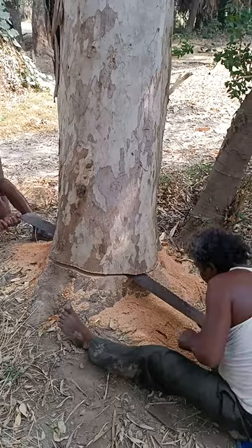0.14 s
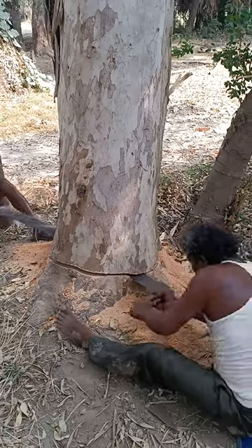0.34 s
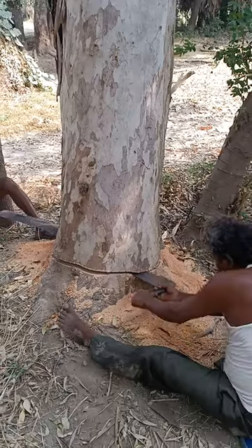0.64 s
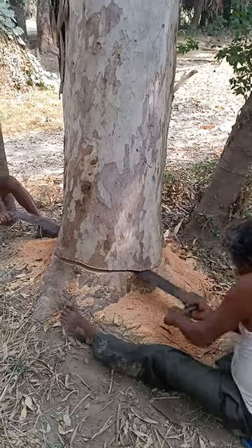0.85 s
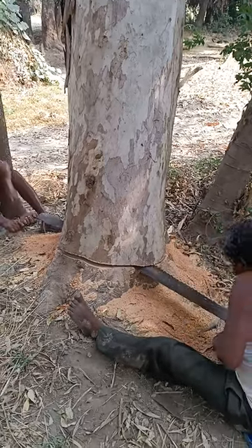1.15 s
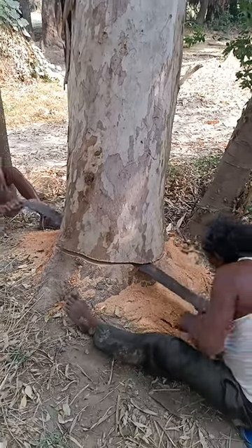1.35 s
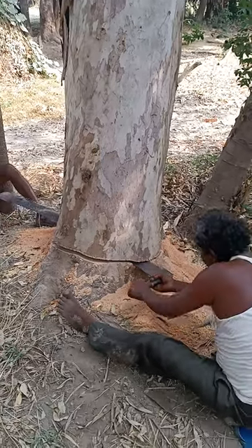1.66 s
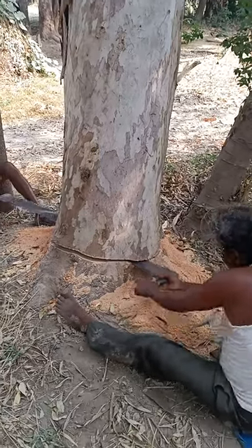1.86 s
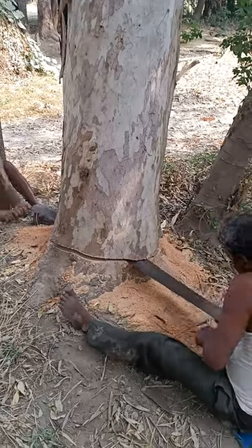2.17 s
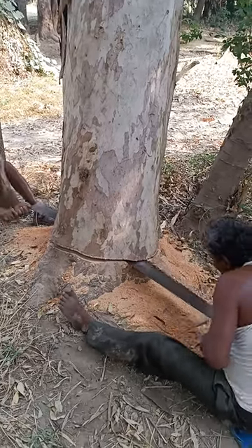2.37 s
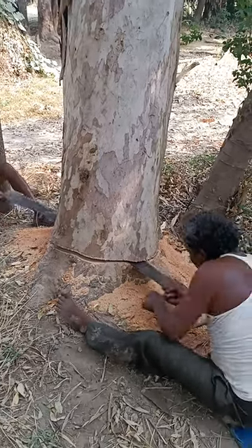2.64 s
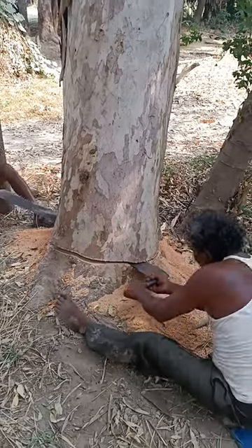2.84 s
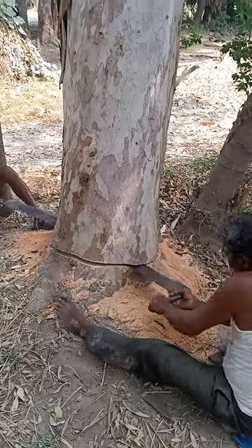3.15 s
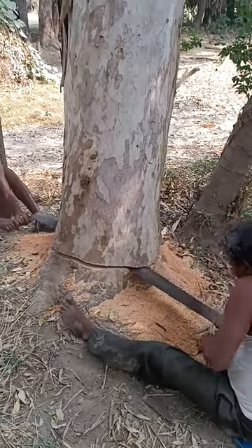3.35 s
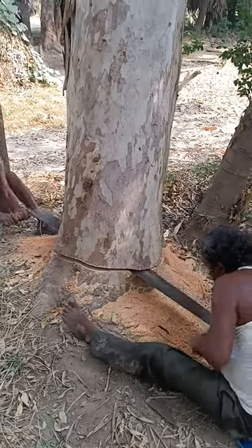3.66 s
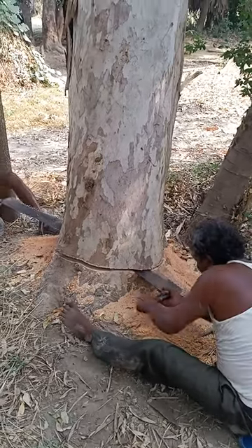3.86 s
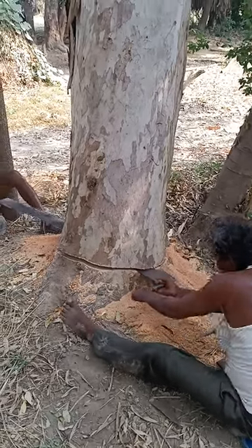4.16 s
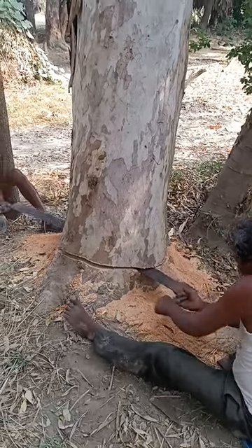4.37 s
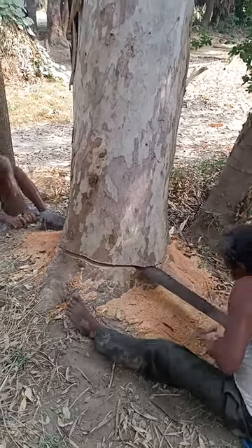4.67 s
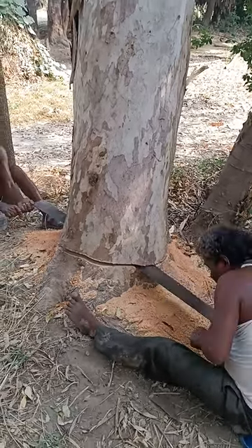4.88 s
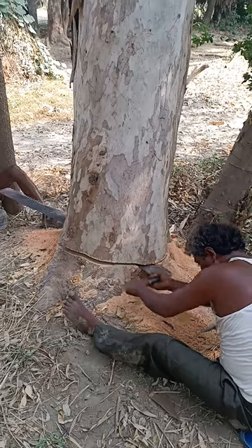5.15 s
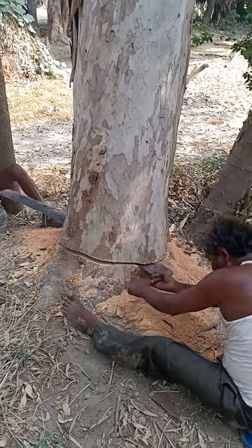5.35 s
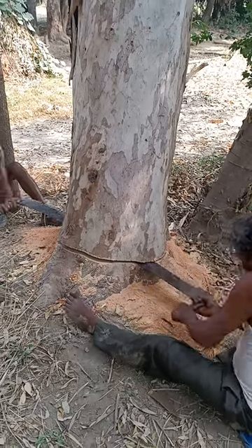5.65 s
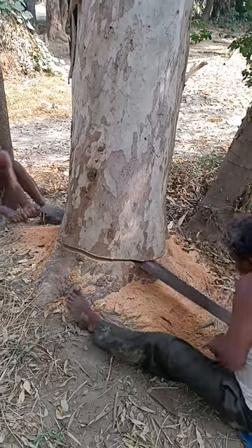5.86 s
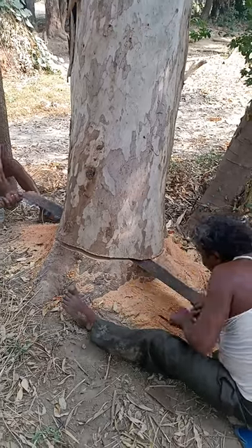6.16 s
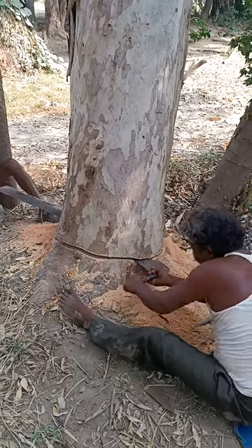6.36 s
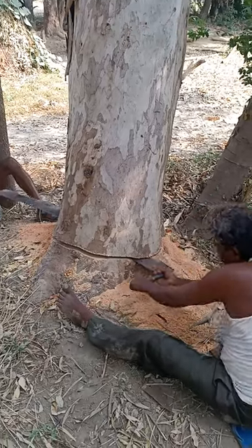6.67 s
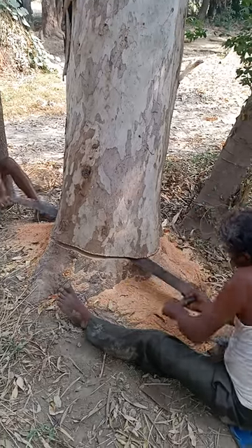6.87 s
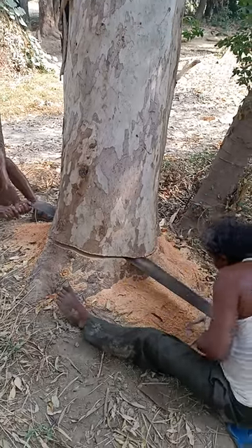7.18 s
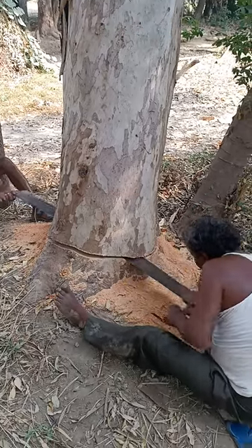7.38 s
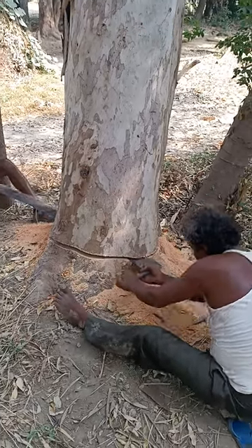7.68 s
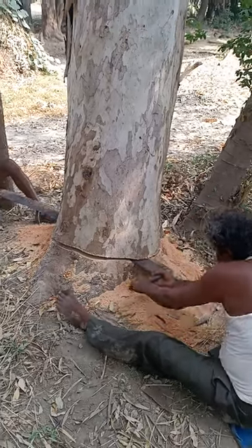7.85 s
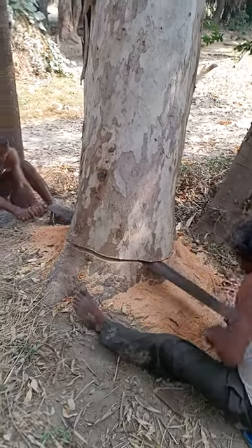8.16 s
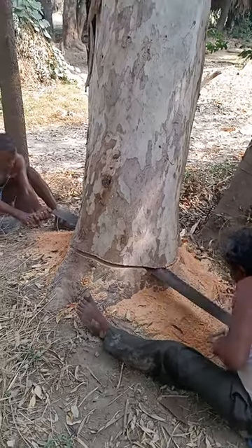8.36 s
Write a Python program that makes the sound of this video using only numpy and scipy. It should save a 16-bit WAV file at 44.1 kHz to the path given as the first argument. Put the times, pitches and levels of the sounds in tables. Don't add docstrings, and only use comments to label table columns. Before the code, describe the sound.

Steady coarse sawing strokes tear wood fibres outdoors, with snags, cracks and one knock on bark, over a distant chugging engine.

```python
import sys
import numpy as np
from scipy import signal
from scipy.fft import irfft
from scipy.io import wavfile
from scipy.ndimage import uniform_filter1d

SR = 44100
rng = np.random.default_rng(int(sys.argv[2]) if len(sys.argv) > 2 else 0)


def gain_from_decibels(decibels):
    exponent = np.asarray(decibels, float) / 20
    return 10 ** exponent


def generate_wav(signal):
    frames = np.transpose(np.atleast_2d(signal))
    scaled = np.clip(frames, -1, 1) * 32767
    pcm = np.round(scaled).astype(np.int16)
    wavfile.write(sys.argv[1], SR, pcm)


N = 375732

# (frequency [Hz], density [dB per Hz])
AIR_SPECTRUM = [(24, -34), (40, -28), (97, 3.5), (170, -11.5), (270, -18), (420, -17), (580, -13.5),
                (740, -2), (950, -9.5), (2000, -6), (2950, -8.5), (3500, -16.5), (6400, -13.5), (7500, -20),
                (8600, -33.5)]
# (frequency [Hz], likeness [0 to 1])
AIR_COHERENCE = [(60, 0.52), (380, 0.84), (750, 0.2), (1300, 0.071), (4400, .03)]
AIR_DB = -52.5

# (frequency [Hz], width [Hz], level [dB])
ENGINE_HUM = [(396, 84, -68), (719, 43, -66), (1097, 40, -64)]
# (frequency [Hz], level [dB], decay by 60 dB [s])
EXHAUST_MODES = [(79, -46, 0.14), (166, -69, .07)]
FIRST_FIRING_S, FIRING_PERIOD_S = 0.072, 0.09008

# (start [s], speeding up [s], full swing [s], slowing down [s], cutting force [dB])
SAW_STROKES = [(0.02, 0.28, 0.076, 0.21, -26), (.70, 0.29, 0.086, 0.14, -28),
               (1.26, 0.19, 0.11, 0.2, -25.5), (1.86, 0.32, 0.067, 0.12, -27),
               (2.41, 0.21, 0.14, 0.16, -23.5), (3.04, .27, .12, .13, -26), (3.61, 0.22, 0.1, 0.18, -25),
               (4.26, 0.17, 0.23, 0.11, -29.5), (4.82, 0.23, 0.11, 0.14, -24),
               (5.43, 0.27, 0.16, 0.14, -28), (6.02, 0.21, 0.13, 0.16, -24), (6.66, 0.24, 0.2, 0.08, -30.5),
               (7.24, .22, 0.12, 0.15, -22.5), (7.86, 0.24, 0.2, 0.088, -31.5),
               (8.41, 0.15, 0.079, 0.081, -28)]
# (power speeding up [1], power slowing down [1], gain over the swing [dB])
FORCE_LAW = [(1.76, 2.33, 2.14), (1.45, 1.58, 0.3)]
# (at start, at top speed, at end of swing, at stop)
# trunk knock relative to the rasp [dB]
KNOCK_ALONG_STROKE = [(-8.5, -1.8, -1.9, 0.5), (-5, -1.8, -0.58, 1.3)]
HISS_ALONG_STROKE = [(0, -1, -3.5, 2.3), (-1.5, -3, -4, -1.5)]
LOWER_BLADE_MODE = [(2860, 2830, 2880, 2670), (2770, 2840, 2790, 2800)]
UPPER_BLADE_MODE = [(5800, 6480, 6300, 5400), (6140, 6250, 6300, 2000)]
# (free [s], binding [s], depth [dB])
BLADE_STALLS = [
    (1.985, 0.026, -1),
    (3.285, 0.055, -13.5),
    (4.365, 0.06, -14),
    (5.478, 0.044, -14),
    (8.256, 0.065, -1.5),
]
# (middle [s], half length [s], force [dB], trunk knock re rasp [dB], blade hiss re rasp [dB])
DEEP_BITES = [(0.261, 0.08, 5, -1.7, -2), (0.432, 0.014, 4.5, -5, -8), (0.807, 0.044, 2.5, 0, -3.5),
              (1.037, 0.13, 5, -0.5, -3.6), (1.301, 0.07, 4, -2.5, 5.5), (2.007, 0.026, 7, 3, 0),
              (2.644, 0.026, 1, -3.5, 1), (2.804, 0.036, 1, 2, 1), (3.724, 0.021, 1.5, 2.2, 0),
              (3.889, 0.041, 3.5, 0.5, -2), (4.018, 0.017, 9.5, -19, -0.7), (4.307, .03, 4, -1, -2),
              (4.848, 0.047, 5, 4, 5.5), (5.137, 0.037, 4.5, -3, -4), (5.847, 0.016, -0.5, 2, 7),
              (6.06, 0.08, 5.5, 4.5, 0), (6.395, 0.021, 7, -13.5, 0.3), (7.098, 0.063, 0.5, -2, 7),
              (7.267, 0.032, 10.5, -5, -2), (7.438, 0.028, 1, -8.5, -1.5), (7.593, 0.021, 2, -1.7, 4),
              (8.063, 0.026, 8, -1, -2.5), (8.284, 0.043, 8, 3.5, -4)]
# (time [s], peak [dB], trunk knock re peak [dB], blade hiss re peak [dB])
TOOTH_CATCHES = [(0.365, -8.5, -9, -21), (0.384, -7.5, -30, -3.5), (0.9074, -10.5, -3.5, -7),
                 (0.97, -18.5, 6, -14), (1.5225, -7, -16, -3), (2.238, -12, 0.5, -17), (2.7033, -16, -1, 2),
                 (3.1378, -17, -3, -14.5), (3.3403, -11, -5, -17), (3.7812, -9, -16, -2.5),
                 (3.8432, -3, -9.5, -3.5), (3.9783, -6, -6.5, -5), (4.366, -17.5, -16, -0.5),
                 (4.472, -12, -9, -3.5), (4.533, -9, -5.5, -1.5), (4.601, -11.5, -7, -0.5),
                 (4.943, -20.5, -18, 7), (4.9904, -10, -7, -18), (5.483, -25, 1, -9),
                 (5.7258, -7, -16, -3.5), (6.166, -15, -2, 2), (6.2555, -4.5, -9, -17),
                 (6.373, -8.5, -23, -12), (6.9468, -10.5, -24, 7), (6.994, -12.5, -24, 0),
                 (7.0204, -11.5, 0, -2), (7.4833, -13, -21, -3), (8.139, -12.5, -11, -2),
                 (8.223, -16, 4.5, 0), (8.2571, -7.5, -7, -9.5)]
# (time [s], peak [dB], trunk knock re peak [dB], blade hiss re peak [dB])
FIBRE_CRACKS = [(0.0755, -25.5, -24, -17), (0.562, -39, -15, -23), (0.602, -38, -15, -20),
                (0.7962, -25.5, -7.5, -14), (1.1259, -5, -20, -14), (2.627, -20, -22.5, -2),
                (2.6555, -18, -21, -13), (3.287, -25, -9, 8), (3.3416, -24, 1.5, -14),
                (3.4305, -15, -17, -3), (4.3644, -28, -9, 3), (4.4733, -24.5, 3.5, -14),
                (4.9416, -22, -9, -1), (5.4797, -30, -6, -20), (5.7268, -38, -19, 0), (6.947, -19, -34, -3),
                (6.953, -24.5, -22, -9), (7.6031, -14, -5, -19), (7.9623, -30, -15, -13),
                (8.2553, -19, -9, -11)]
HANDLE_TICK_S, HANDLE_TICK_DB = 1.1268, -17

# (frequency [Hz], width [Hz], level [dB])
TRUNK_MODES = [(407.5, 38, -1), (844, 440, -3.5), (980, 87, -6.5)]
# (frequency [Hz], level [dB])
LEFT_PORT = [(130, -26), (170, -21.5), (430, -11.5), (510, -14.5), (630, -11.5), (720, -7), (950, -2.3),
             (1420, -12.5), (2370, -5.5), (2970, -1.5), (3360, -8), (3960, -12), (4310, -13), (6290, -4.5),
             (7110, -18), (9260, -21)]
# (frequency [Hz], level [dB])
RIGHT_PORT = [(130, -26), (430, -4.5), (540, -11), (960, -9.5), (1140, -16), (1450, -6), (1900, -7.5),
              (2700, -4), (2980, -10.5), (3350, -7.5), (3800, -17), (5200, -11.5), (6200, -4), (7600, -11)]
# (frequency [Hz], left [dB], right [dB])
PORT_ROLLOFF = [(40, -19.5, -4), (127, 4, 1), (7590, 0, 1.5), (8520, 1.5, -11.5), (9960, -3.5, -12),
                (10400, -6.5, -18), (12100, -13.5, -22.5), (14100, -9.5, -15), (16100, -32, -12)]
# (frequency [Hz], level re direct [dB])
STREWN_SHARE = [(200, -43), (900, -5), (1500, -13), (3000, 1), (6000, -3.5), (12000, 9.5)]


def evened(x):
    return x / np.sqrt(np.mean(np.atleast_2d(x).mean(0) ** 2) + 1e-20)


def read(points, hz, column=1):
    table = np.transpose(points)
    return np.interp(np.log(hz + 1), np.log(table[0] + 1), table[column])


def patchy(x, depth_db, frames, bins, size=256):
    overlap = size * 3 // 4
    z = signal.stft(x, nperseg=size, noverlap=overlap)[2]
    field = uniform_filter1d(rng.standard_normal(z.shape[1:]), bins, 0)
    field = uniform_filter1d(field, frames, 1)
    z = z * gain_from_decibels(depth_db * field / field.std())
    return signal.istft(z, nperseg=size, noverlap=overlap)[1][:, :N]


def resonate(x, hz, width_hz):
    turn = np.exp(2j * np.pi * np.cumsum(hz) / SR)
    r = np.exp(-np.pi * width_hz / SR)
    return 2 * (turn * signal.lfilter([1 - r], [1, -r], x / turn)).real


def air():
    frames, hz = N // 256 + 5, np.fft.rfftfreq(1024, 1 / SR)
    a, b, c, d = rng.standard_normal((frames, 513, 4), np.float32).T
    left = a + 1j * b
    same = np.clip(read(AIR_COHERENCE, hz), -1, 1)[:, None]
    right = same * left + np.sqrt(1 - same ** 2) * (c + 1j * d)
    density_db = read(AIR_SPECTRUM, hz) - 0.0041 * np.maximum(hz - 8600, 0)
    z = np.array([left, right]) * gain_from_decibels(density_db)[:, None]
    wash = signal.istft(z, nperseg=1024, noverlap=768)[1][:, :N]
    return gain_from_decibels(AIR_DB - 1.5) * evened(patchy(wash, 1.8, frames=30, bins=3))


def drone():
    out = np.zeros((2, N))
    for hz, width_hz, db in ENGINE_HUM:
        common, left, right = rng.standard_normal((3, N))
        curve_hz = np.full(N, float(hz))
        for side, own in zip(out, (left, right)):
            once = resonate(common + 0.85 * own, curve_hz, width_hz)
            side += gain_from_decibels(db) * evened(resonate(once, curve_hz, width_hz))
    return out


def pump():
    count = int(N / SR / FIRING_PERIOD_S) + 2
    chance = rng.standard_normal((count, 3))
    starts = FIRST_FIRING_S + FIRING_PERIOD_S * np.arange(-1, count - 1) + 0.00016 * chance[:, 0]
    lead_s = 0.2
    thumps, chuffs = np.zeros((2, N + SR))
    thumps[np.round((starts - 0.0255 + lead_s) * SR).astype(int)] = gain_from_decibels(0.3 * chance[:, 1])
    chuffs[np.round((starts - 0.0065 + lead_s) * SR).astype(int)] = gain_from_decibels(0.5 * chance[:, 2])

    t = np.arange(6000) / SR
    pipe = sum(gain_from_decibels(db - 60 * t / t60) * np.sin(2 * np.pi * hz * t) for hz, db, t60 in EXHAUST_MODES)
    swell_s, cutoff_s = 0.0115, 0.0014
    swell = np.clip(t / swell_s, 0, 1) ** 1.1 * np.exp(-np.maximum(t - swell_s, 0) / cutoff_s)
    chuff = gain_from_decibels(-42.0) * swell * np.sin(2 * np.pi * 770 * t)
    chuff += gain_from_decibels(-13) * np.roll(chuff, round(0.024 * SR))

    lead = round(lead_s * SR)
    low = signal.oaconvolve(thumps, pipe)[lead:lead + N]
    high = signal.oaconvolve(chuffs, chuff)[lead:lead + N]
    return low * gain_from_decibels([[0.8], [-0.8]]) + high * gain_from_decibels([[-1.1], [1.1]])


def strokes(t):
    s = t[::32]
    force, corners = np.full(len(s), 1e-5), []
    for k, (start, rise, swing, fall, db) in enumerate(SAW_STROKES):
        up, down, gained_db = FORCE_LAW[k % 2]
        marks = start + np.cumsum([0, rise, swing, fall])
        speed = np.interp(s, marks[:2], [0, 1]) ** up * np.interp(s, marks[2:], [1, 0]) ** down
        force += speed * gain_from_decibels(db + np.interp(s, marks[1:3], [0, gained_db]))
        corners += list(marks)
    rows = [20 * np.log10(force)]
    for rule in (KNOCK_ALONG_STROKE, HISS_ALONG_STROKE, LOWER_BLADE_MODE, UPPER_BLADE_MODE):
        rows.append(np.interp(s, np.sort(corners), np.resize(rule, len(corners))))
    rows = np.array(rows)
    for free, binding, depth_db in BLADE_STALLS:
        rows[0] += depth_db * np.interp(s, [free - binding, free, free + 0.002], [0, 1, 0])
    for middle, half, *gains_db in DEEP_BITES:
        bite = np.cos(np.pi / 2 * np.clip((s - middle) / half, -1, 1)) ** 2
        rows[:3] += np.outer(gains_db, bite)
    return [np.interp(t, s, row) for row in rows]


def drift(fastest_s):
    size = max(round(fastest_s * SR), 1)
    return evened(uniform_filter1d(uniform_filter1d(rng.standard_normal(N), size), size))


def fibres(per_s, spread_db):
    size = gain_from_decibels(spread_db * np.minimum(rng.exponential(1, N), 5)) * rng.standard_normal(N)
    return evened(size * (rng.random(N) < per_s / SR))


def causal(gain_db, size=2048):
    log_gain = np.log(gain_from_decibels(np.maximum(gain_db, -100)))
    circle = np.concatenate([log_gain, log_gain[-2:0:-1]])
    return irfft(np.exp(np.conj(signal.hilbert(circle)))[:len(log_gain)])[:size]


def heard(direct, strewn, low_hz, high_hz):
    hz = np.fft.rfftfreq(8192, 1 / SR)
    band_db = -10 * np.log10((1 + (low_hz / (hz + 1)) ** 12) * (1 + (hz / high_hz) ** 12))
    colour_db = [read(port, hz) + read(PORT_ROLLOFF, hz, column=k + 1) + band_db
                 for k, port in enumerate((LEFT_PORT, RIGHT_PORT))]
    share = gain_from_decibels(read(STREWN_SHARE, hz)) ** 2
    near = np.array([causal(db - 10 * np.log10(1 + share)) for db in colour_db])
    far = np.array([causal(db - 10 * np.log10(1 + 1 / share)) for db in colour_db])
    scale = np.sqrt(np.sum(near.mean(0) ** 2) + np.sum(far ** 2) / 4)
    both = signal.oaconvolve(direct[None], near, axes=1) + signal.oaconvolve(strewn, far, axes=1)
    return both[:, :N] / scale


def catches():
    burst = np.zeros((3, N))
    after = np.arange(2600) / SR
    shape = np.exp(-after / 0.017) * np.minimum(after / 0.0007, 1)
    for at, peak_db, knock_db, hiss_db in TOOTH_CATCHES:
        span = burst[:, round(at * SR):][:, :len(shape)]
        span += gain_from_decibels(peak_db - 15.0 + np.array([[knock_db + 0.5], [0], [hiss_db]])) * shape
    return burst


def cracks():
    clicks = np.zeros((3, N))
    for at, peak_db, knock_db, hiss_db in FIBRE_CRACKS:
        clicks[:, round(at * SR) + 20] = -gain_from_decibels(peak_db + np.array([knock_db + 19.5, 9, hiss_db + 12]))
    return clicks


def handle_tick():
    tick = np.zeros(N)
    tick[round(HANDLE_TICK_S * SR)] = gain_from_decibels(HANDLE_TICK_DB)
    return signal.sosfilt(signal.butter(2, 8000, "high", fs=SR, output="sos"), tick)


def saw():
    t = np.arange(N) / SR
    force_db, trunk_db, blade_db, lower_hz, upper_hz = strokes(t)
    steady = [gain_from_decibels(force_db + db - 3.64) for db in (trunk_db, 0, blade_db)]
    burst, clicks = catches(), cracks()
    judder = gain_from_decibels(0.84 * drift(0.012) + 0.49 * drift(0.001))
    shared = fibres(11000, 3.04)
    linger = np.exp(-1 / (0.0027 * SR))
    modes = [TRUNK_MODES, [(lower_hz, 220, 1.5)], [(upper_hz, 380, 1.5)]]
    # (lowest [Hz], highest [Hz], share of its own fibres)
    bands = [(20, 1171, 0.93), (1248, 4130, 0.78), (3700, 13700, 0.86)]
    out = np.zeros((2, N))
    for k, (low_hz, high_hz, own) in enumerate(bands):
        tearing = judder * gain_from_decibels(0.97 * drift(0.0037)) * (shared + own * fibres(14000, 2.02))
        tearing /= np.sqrt(uniform_filter1d(tearing ** 2, round(0.064 * SR)))
        direct = tearing * np.hypot(steady[k], burst[k]) + clicks[k]
        power = signal.lfilter([1 - linger], [1, -linger], direct ** 2)
        strewn = np.sqrt(power) * rng.standard_normal((2, N))
        ringing = sum(gain_from_decibels(db) * resonate(direct, hz + 0 * t, width_hz) for hz, width_hz, db in modes[k])
        out += heard(0.61 * (direct + ringing), strewn, low_hz, high_hz)
    out = patchy(out, 0.8, frames=14, bins=4)
    return patchy(out, 3.09, frames=4, bins=3, size=1024) + handle_tick()


def scene():
    return air() + drone() + pump() + saw()


def low_pass(x):
    return signal.sosfilt(signal.butter(12, 16500, fs=SR, output="sos"), x)


def record(dry):
    cut = signal.sosfilt(signal.butter(3, 58, "high", fs=SR, output="sos"), dry)
    return low_pass(cut)


dry = scene()
out = record(dry)
generate_wav(out)
```